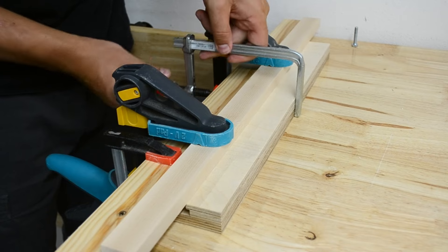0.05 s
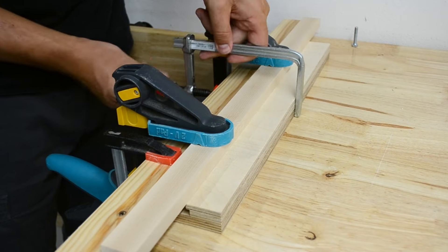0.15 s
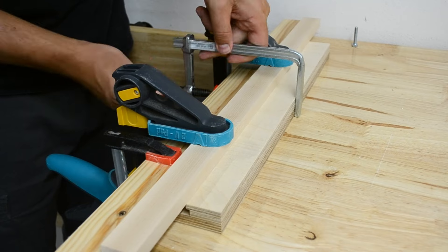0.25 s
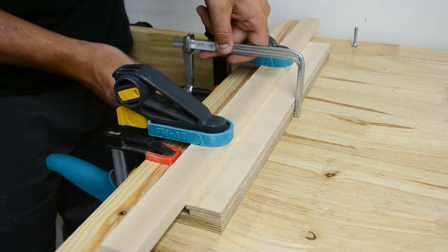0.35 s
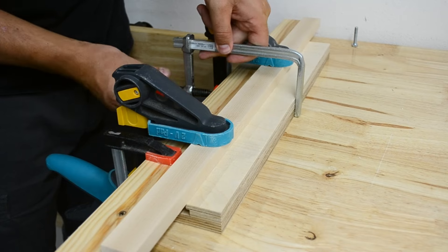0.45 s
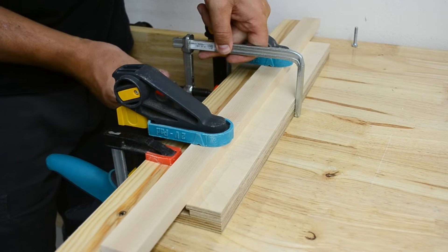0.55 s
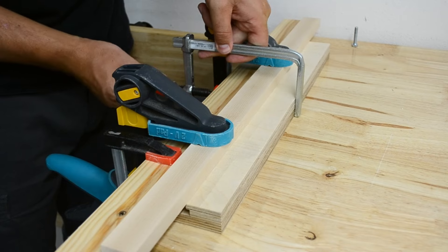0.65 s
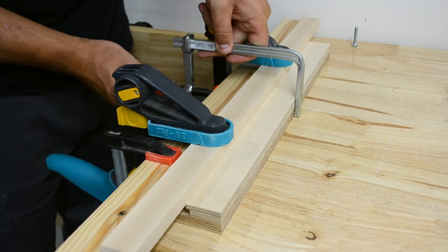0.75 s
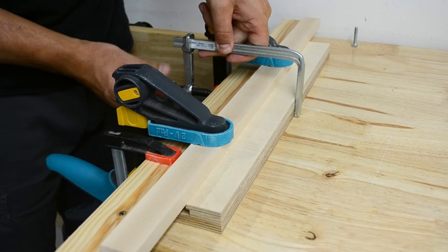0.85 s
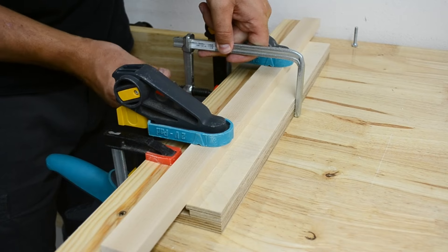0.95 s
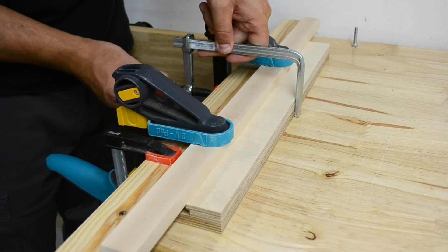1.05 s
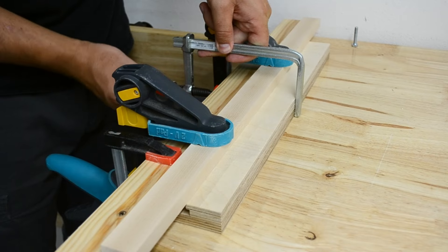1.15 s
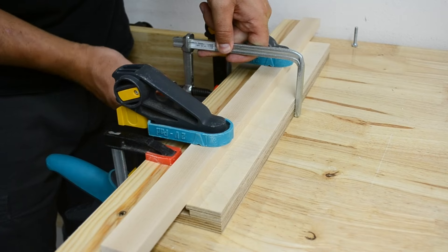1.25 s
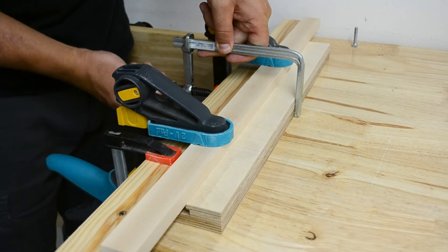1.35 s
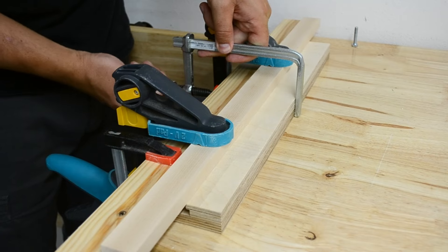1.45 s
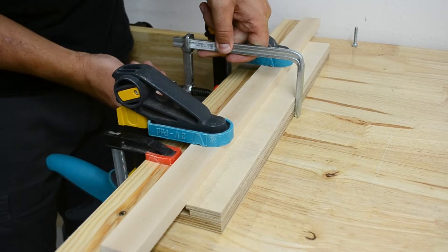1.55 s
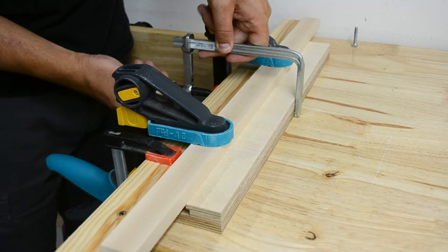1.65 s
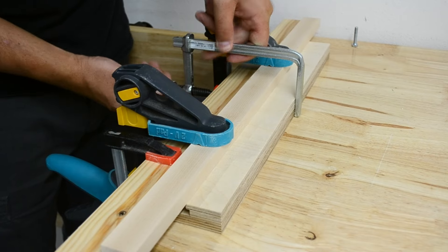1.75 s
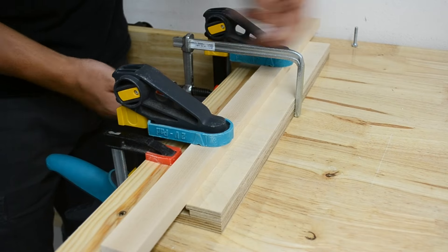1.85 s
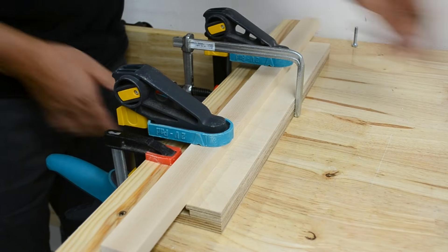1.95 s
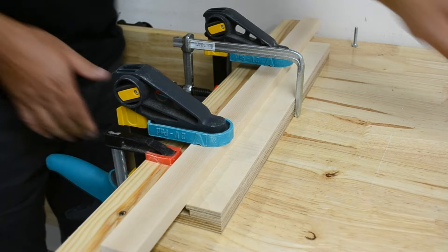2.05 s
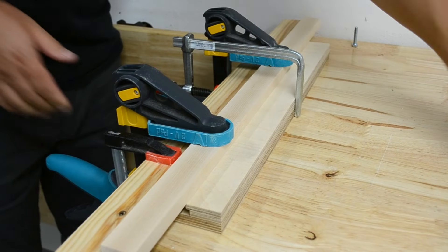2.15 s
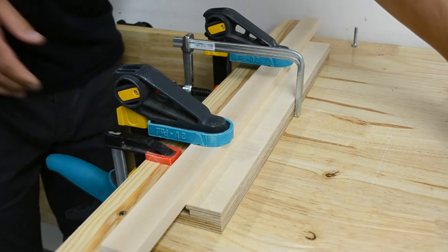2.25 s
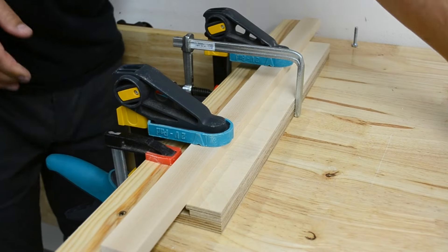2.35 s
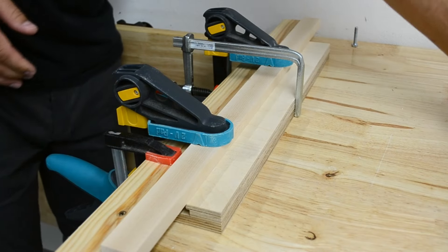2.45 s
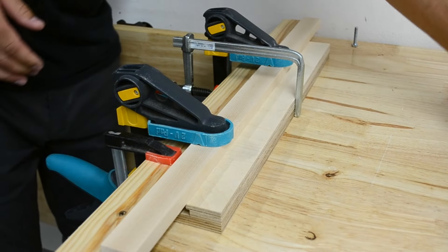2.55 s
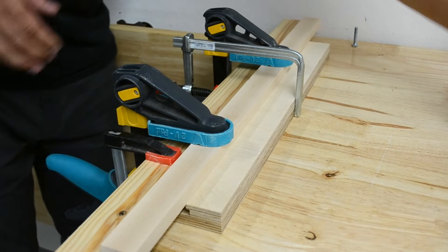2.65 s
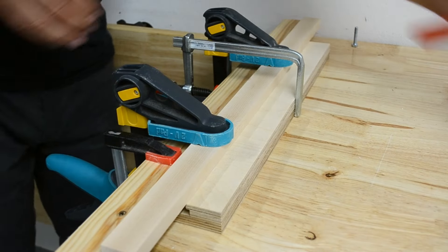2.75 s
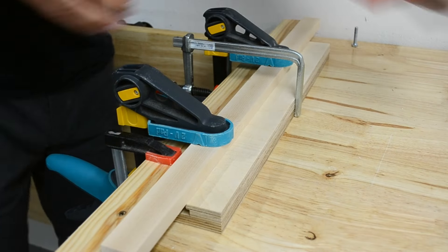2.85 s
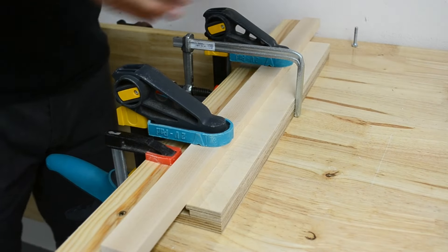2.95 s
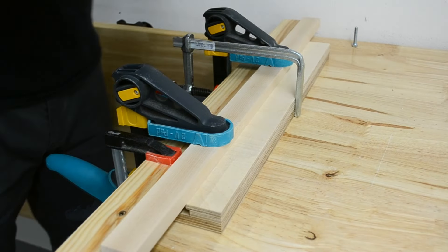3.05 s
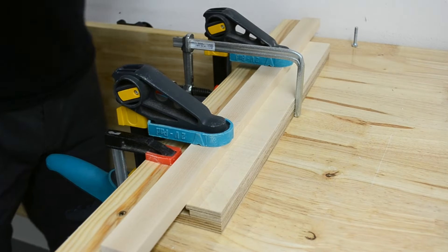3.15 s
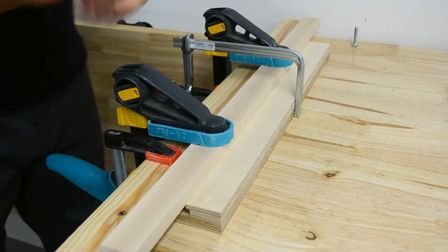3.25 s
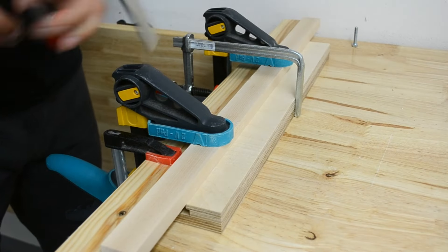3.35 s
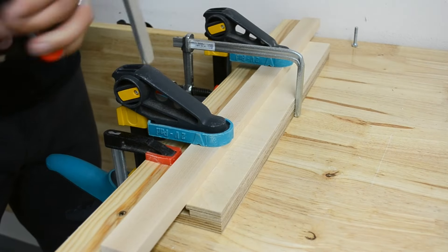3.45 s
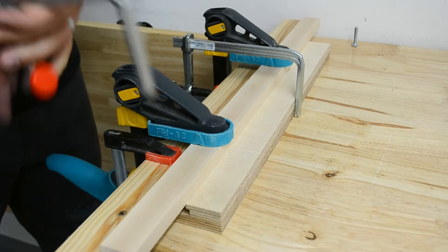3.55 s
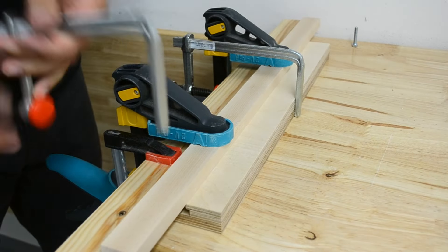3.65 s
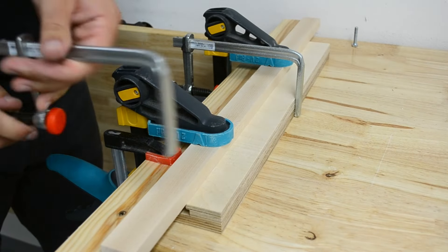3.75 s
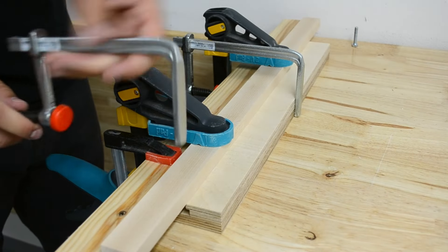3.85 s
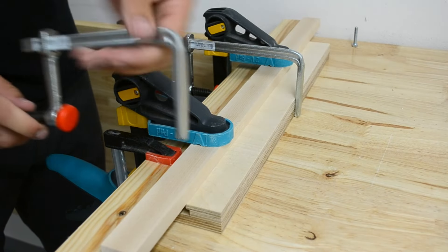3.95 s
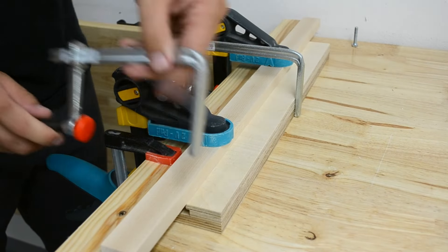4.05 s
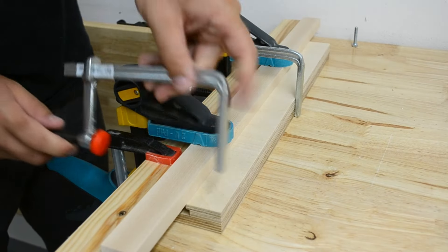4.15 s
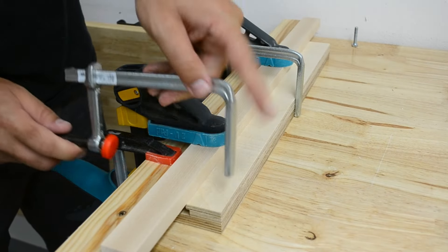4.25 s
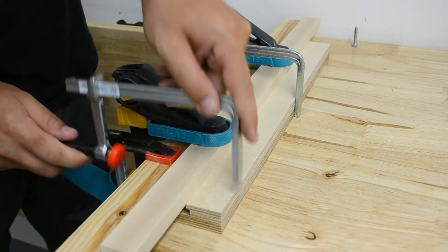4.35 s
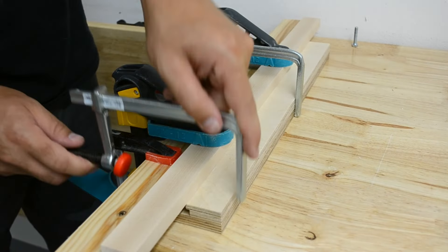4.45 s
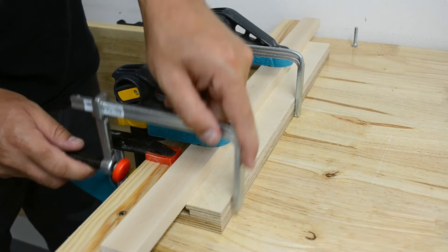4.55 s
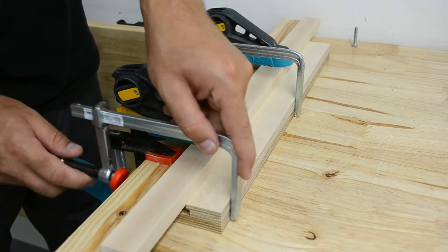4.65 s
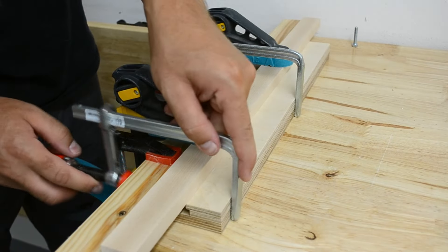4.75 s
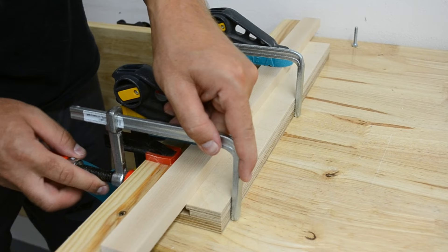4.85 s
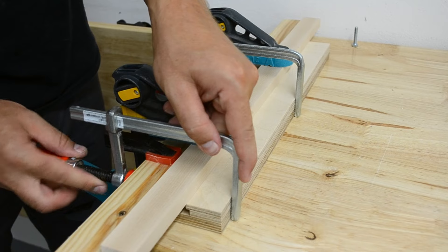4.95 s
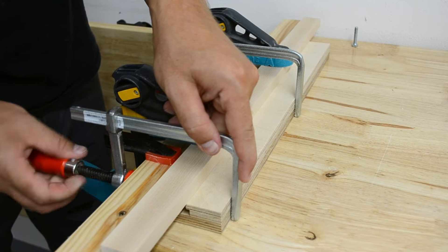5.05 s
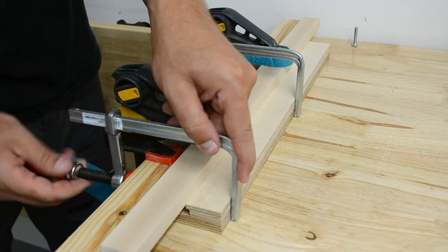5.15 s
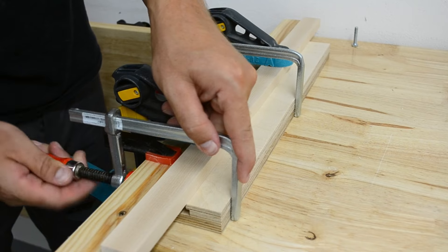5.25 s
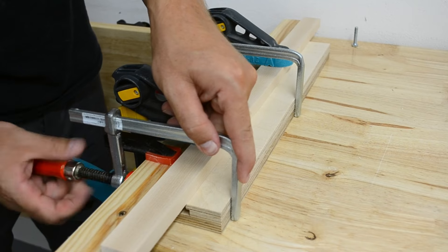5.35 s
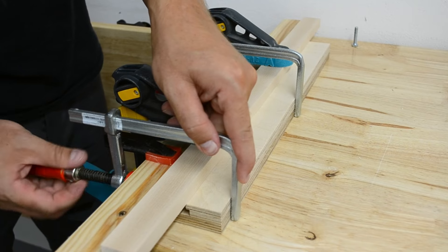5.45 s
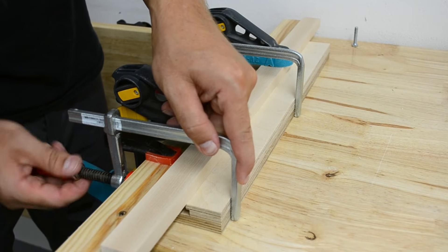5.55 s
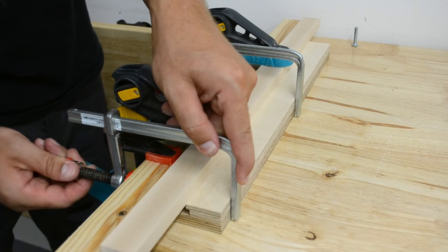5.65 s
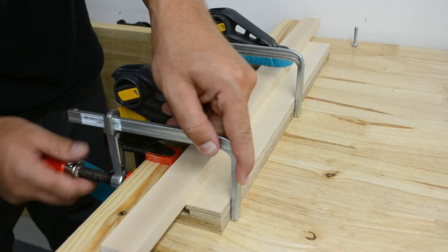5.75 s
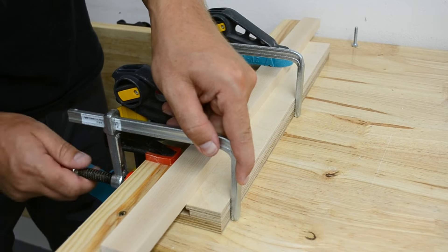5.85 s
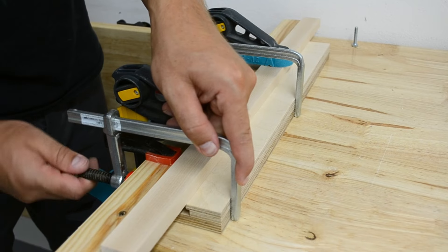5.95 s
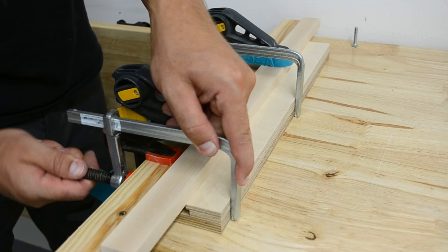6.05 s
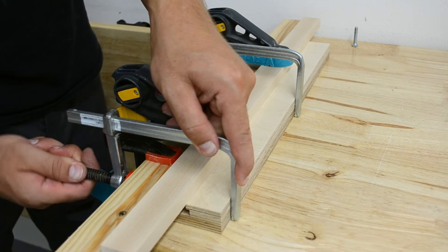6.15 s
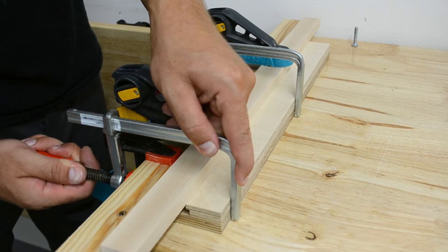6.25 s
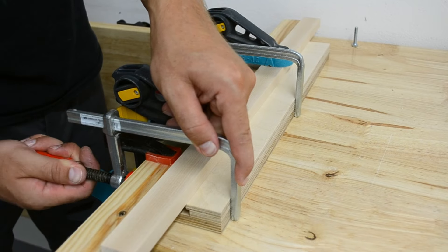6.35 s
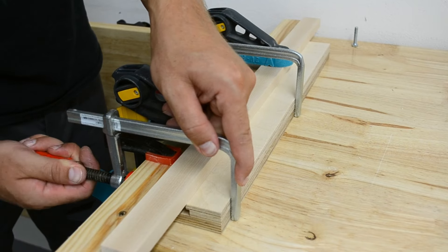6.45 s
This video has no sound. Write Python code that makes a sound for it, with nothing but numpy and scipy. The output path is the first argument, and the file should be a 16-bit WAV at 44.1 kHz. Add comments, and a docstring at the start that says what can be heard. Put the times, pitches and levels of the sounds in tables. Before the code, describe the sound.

Faint rubbing and light taps of hands on wood give way to a few dull knocks on a workbench, which hums briefly. A steel bar clamp clicks sharply, then its loose jaw slides down the bar in a bright, ringing rattle. More metal clicks and soft knocks follow as it is set on plywood and tightened. The sounds are close, in a slightly echoing workshop with a low hiss.

```python
"""Clicks, a bright rattle and dull knocks: steel bar clamps are picked up, set on plywood and tightened.
The loose jaw clicks and rattles on its bar; each contact is a noise burst plus ringing steel modes.
The workbench knocks and hums under the blows; hands and pads rub over the wood.
The hard-walled shop rings on over a low hiss."""
import sys
import numpy as np
from scipy import signal
from scipy.io import wavfile
from scipy.ndimage import uniform_filter1d

SR = 44100
rng = np.random.default_rng(int(sys.argv[2]) if len(sys.argv) > 2 else 0)


def bounce(signal):
    """Save signal as a 16-bit WAV file at the path given by the first command-line argument."""
    frames = np.transpose(np.atleast_2d(signal))
    limited = np.clip(frames, -1, 1)
    pcm = np.round(limited * 32767).astype(np.int16)
    wavfile.write(sys.argv[1], SR, pcm)


N = 286189

# modes of the clamp bar and of the bench: f/Hz, level/dB, t60/s
BAR_MODES = [(2180, -14, 0.12), (2433, -6.5, 0.19), (2850, -15.5, 0.18), (4000, -0.5, 0.13),
             (4470, -6.5, 0.12), (4670, -6, 0.15), (4950, -4.5, 0.3), (5500, -4, 0.091), (6185, -7, 0.14),
             (6700, -3, 0.22), (7330, -2.5, 0.2), (7430, -4.5, 0.3), (9100, -9.5, 0.17), (9760, -5, 0.51),
             (10230, -7.5, 0.51)]
BENCH_MODES = [(141.8, -9, 0.3), (157.3, -6, 0.3), (345, 7, 0.038), (408, 4.5, 0.33), (469, -8.5, 0.11),
               (591, -1, 0.45), (724, 6, 0.24), (696, -0.5, 0.22), (802, -2.5, 0.36), (1008, 3.5, 0.25),
               (950, -5.5, 0.18), (1254, 0, 0.13), (1315, 0.5, 0.22), (1890, 8, 0.12), (2430, -3, 0.06)]
# contact spectra of steel and of wood: f/Hz, level/dB
STEEL_DB = [(500, -45.5), (1100, -26), (1600, -9.5), (2400, -9.5), (3250, -2), (4200, -3), (4900, -3.5),
            (5750, 1), (6500, -1), (7350, -6), (8500, 1.5), (9600, 0.5), (10300, -4), (10700, -11.5),
            (11350, -24.5)]
WOOD_DB = [(60, -51.5), (108, -20.5), (135, 9), (165, 2), (200, -2), (260, 2.5), (500, -2), (1100, -3),
           (2400, -9), (3100, -18), (3700, -32.5), (6000, -44.5), (12000, -63.5)]
LEAD_IN = 6  # contact lengths over which a click or knock swells to its peak
RISE_MS = 2.6


def gain_of(db):
    """Decibels to gain."""
    return 10 ** (np.asarray(db) / 20)


def evened(x):
    """Scaled to rms 1."""
    return x / np.sqrt(np.mean(x ** 2) + 1e-20)


def peaked(x):
    """Scaled to peak 1."""
    return x / abs(x).max()


def read(points, hz):
    """Reads a table on a log-frequency axis."""
    f, value = np.transpose(points)
    return np.interp(np.log(hz + 1), np.log(f + 1), value)


def add(mix, s, sound):
    """Mixes a sound in at s seconds."""
    part = mix[round(s * SR):][:len(sound)]
    part += sound[:len(part)]


def coloured(x, db_at):
    """Causal filter with gain db_at(Hz): phase from the Hilbert transform of the log gain."""
    log_gain = np.log(gain_of(db_at(abs(np.fft.fftfreq(2048, 1 / SR)))))
    taps = np.fft.ifft(np.exp(np.conj(signal.hilbert(log_gain)))).real[:1024]
    return signal.oaconvolve(x, taps)[:len(x)]


def eq_of(points, humps=()):
    """Level/dB as a function of f/Hz: points plus Gaussian humps (f/Hz, level/dB, width/octaves)."""
    return lambda hz: read(points, hz) + sum(db * np.exp(-(np.log2((hz + 1) / f) / octaves) ** 2)
                                             for f, db, octaves in humps)


def shop_hiss(rms_db=-68.5):
    """Room air and microphone noise with faint drifting patches."""
    # noise density: f/Hz, relative level/dB
    hiss_density = [(15, -58), (25, -23), (97, -9.5), (132, -9), (200, -4.5), (309, -3.5), (399, -1.5),
                    (454, -1.5), (667, -3.5), (1030, -4), (1110, -6), (1300, -6.5), (2800, -13),
                    (10100, -29), (11500, -44.5), (15000, -71), (22000, -120)]
    frames, hz = N // 256 + 5, np.fft.rfftfreq(1024, 1 / SR)
    real, imag, wander = rng.standard_normal((frames, 513, 3)).T
    patches_db = evened(uniform_filter1d(uniform_filter1d(wander, 30, 0), 14, 1))
    bins = (real + 1j * imag) * gain_of(read(hiss_density, hz)[:, None] + patches_db)
    return gain_of(rms_db) * evened(signal.istft(bins, nperseg=1024, noverlap=768)[1][:N])


def shop_decay(x):
    """Each band of x dies at the room's own rate."""
    # reverberation of the shop: f/Hz, t60/s
    decay_times = [(500, 0.6), (1320, 0.74), (3480, 0.73), (9190, 0.46)]
    hz, t, bins = signal.stft(x, SR, nperseg=256)
    bins = bins * gain_of(-60 * t / read(decay_times, hz)[:, None])
    return signal.istft(bins, SR, nperseg=256)[1][:len(x)]


def earlier_tail(start_db=-61.5):
    """Fading room tail of a blow before the start."""
    wash = coloured(rng.standard_normal(SR), eq_of([(100, -25), (300, 0), (2950, -4), (9000, -25)]))
    return np.pad(gain_of(start_db) * shop_decay(evened(wash)), (0, N - SR))


def shop_reverb(x, build_s=0.0065):
    """Sparse wall reflections build up and decay; three tails in rotation keep like blows apart."""
    t, clock, out = np.arange(SR) / SR, np.arange(N) / SR, np.zeros(N)
    slots = np.arange(0, SR - 20, 20)
    for k in range(3):
        taps = np.zeros(SR)
        taps[slots + rng.integers(0, 20, len(slots))] = rng.choice([-1., 1.], len(slots))
        tail = shop_decay(taps) * (1 - np.exp(-(t / build_s) ** 2))
        crossfade = np.sqrt(2 / 3) * np.cos(np.pi * (7 * clock + k / 3))
        out += signal.fftconvolve(x * crossfade, tail / np.linalg.norm(tail))[:N]
    return out


def part_response(modes, samples, t60_scale):
    """Impulse response of bar or bench: one damped sine per mode."""
    t = np.arange(samples) / SR
    return sum(gain_of(db - 60 * t / (t60_scale * t60)) * np.sin(2 * np.pi * hz * t)
               for hz, db, t60 in modes)


def rubbing():
    """Hands and pads on wood: grainy friction rings the bench modes under a dry rustle."""
    # strokes: t/s, length/s, first level/dB, change to the end/dB, rustle/dB
    rub_strokes = [(0.053, 0.64, -68, -7, -10), (0.81, 0.61, -73, -29, 1.5), (1.725, 0.57, -82.5, 1.5, 8),
                   (4.548, 0.12, -78.5, 12, -18), (5.098, 0.86, -62.5, -22.5, -7)]
    rustle_eq = eq_of([(800, -27), (2000, -2.5), (7400, -17.5), (8000, -13), (9500, -10.5), (11500, -31)])
    bench = part_response(BENCH_MODES[2:], SR // 4, t60_scale=0.65)  # strokes miss the deepest modes
    out = np.zeros(N)
    for s, length_s, db, change_db, rustle_db in rub_strokes:
        t = np.arange(0, length_s, 1 / SR)
        grain = gain_of(2.2 * evened(uniform_filter1d(rng.standard_normal(len(t)), 400)))
        friction = grain * rng.standard_normal((2, len(t)))
        body = evened(signal.oaconvolve(coloured(friction[0], eq_of(WOOD_DB)), bench)[:len(t)])
        rustle = gain_of(rustle_db) * evened(coloured(friction[1], rustle_eq))
        level = gain_of(db + change_db * t / length_s) * signal.windows.tukey(len(t), .1)
        add(out, s, level * (body + rustle))
    return out


def bench_hum(hz=256.7, rise_s=0.0224):
    """A low mode of the bench top rises over some cycles and rings long."""
    # blows that excite the mode: t/s, level/dB, t60/s
    hum_onsets = [(2.357, -46, 0.57), (2.575, -40, 0.71), (5.24, -61, 0.96), (5.426, -68.5, 0.96),
                  (5.599, -79, 0.96), (5.7, -73.5, 0.96)]
    t, out = np.arange(SR) / SR, np.zeros(N)
    for s, db, t60 in hum_onsets:
        level = gain_of(db - 60 * t / t60) * (1 - np.exp(-t / rise_s))
        add(out, s, level * np.sin(2 * np.pi * hz * (t + s)))
    return out


def throbbing_modes(t, modes, eq, notes_hz, beat_hz=29.8, beat_depth=0.69, detune=0.007):
    """Each mode is a close pair and throbs; the changing grip shifts it from blow to blow."""
    hz, db, t60 = np.transpose(modes)[:, :, None]
    d_level, d_phase, d_pitch, d_beat, d_beat_phase = rng.standard_normal((5, len(modes), 1))
    hz = hz * (1 + detune * d_pitch)
    near_lift = eq_of([(1, 0)], [(f, 7, .04) for f in notes_hz])  # modes near the spot's notes ring most
    level_db = db + eq(hz) + near_lift(hz) + 2 * d_level
    beat = 1 + beat_depth * np.cos(2 * np.pi * beat_hz * gain_of(4 * d_beat) * t + np.pi * d_beat_phase)
    return (beat * gain_of(level_db - 60 * t / t60) * np.sin(2 * np.pi * hz * t + np.pi * d_phase)).sum(0)


def blow(eq, material, modes, contact_ms, notes_hz, ring_db, note_db, note_cycles, free_s=1, lift=()):
    """Contact noise swells and dies; the struck spot and the whole part ring. Rows: direct, room send."""
    choke_db_per_s, ring_send_db = 348.5, -10
    t = np.arange(SR // 2) / SR
    peak_s = LEAD_IN * contact_ms / 1000
    from_peak_ms, after_s = 1000 * (t - peak_s), np.maximum(t - peak_s, 0)
    onset = from_peak_ms / min(RISE_MS, 1.3 * contact_ms)
    rise = 1 / (1 + np.exp(-1.08 * onset))
    crack = rng.standard_normal(len(t)) * np.exp(np.where(t < peak_s, onset, -from_peak_ms / contact_ms))
    push = signal.unit_impulse(len(t), round(peak_s * SR))  # the room hears all sides: a smooth colour
    crack, push = (coloured(x, lambda hz: eq(hz) + read(material, hz)) for x in (crack, push))
    crack = peaked(coloured(crack, eq_of([(1, 0)], lift)))
    push *= np.linalg.norm(crack) / np.linalg.norm(push)
    notes = sum(gain_of(-60 * after_s * hz / note_cycles) * np.sin(2 * np.pi * hz * t) for hz in notes_hz)
    notes = gain_of(note_db) * peaked(rise * notes)
    choke = gain_of(-choke_db_per_s * np.maximum(after_s - free_s, 0))
    ring = gain_of(ring_db) * peaked(rise * choke * throbbing_modes(t, modes, eq, notes_hz))
    direct = crack + notes + ring
    send = push + .2 * notes + gain_of(ring_send_db) * ring
    return np.array([direct, send]) / abs(direct).max()


def place_blow(mix, peak_s, db, room_db, contact_ms, sound):
    """Mixes in a blow's direct sound and room send, timed by its peak."""
    for track, part, level_db in zip(mix, sound, (db, db + room_db)):
        add(track, peak_s - LEAD_IN * contact_ms / 1000, gain_of(level_db) * part)


def bench_knocks(contact_ms=4.5):
    """Blows into the wood: a thud at the struck spot, then the bench modes."""
    # t/s, peak/dB, bass/dB, tilt/(dB/octave), room send/dB, thud f/Hz
    knock_rows = [(0.198, -56.5, -8, -4.5, 9.5, 595), (0.262, -56.5, -19, -5, -3, 682),
                  (0.285, -59, -10, -12, -3, 407), (0.446, -55, -34, -5, 7, 1050),
                  (0.829, -64, -22, -9, 8, 397), (0.934, -53.5, -13, -2, 2, 1028),
                  (1.177, -56.5, -5, -9, 4, 557), (1.279, -64.5, -18, -17, -3, 431),
                  (1.736, -61.5, -30, -1, 14, 557), (2.322, -53, -13, -6, 9, 1010),
                  (2.359, -41.5, -16.5, -7, 11.5, 1006), (2.399, -37, -26.5, -5, 7, 415.7),
                  (2.482, -21.5, -23, 1, 4.5, 850), (2.508, -33.5, -17, -2.5, -1, 386),
                  (2.521, -32.5, -19, 0.5, -1, 1001), (2.562, -23, -10.5, -4.5, -1, 435.4),
                  (2.607, -32, -24, -10, -7.5, 438), (2.76, -42.5, -4, 5.5, 6.5, 1104),
                  (4.674, -54.5, 2, -5, 5.5, 424), (4.738, -41, -10.5, -1, 2, 333.6),
                  (4.757, -46, -19, -7, 0, 697), (4.793, -46, 2, 0, 7.5, 411),
                  (4.849, -46.5, 1, 9, -8, 138.7), (5.075, -48.5, -3.5, 5, 3.5, 408),
                  (5.151, -51, -0.5, -2.5, 5.5, 993), (5.178, -46, -5, -2.5, 1, 674),
                  (5.225, -46, 0, -3.5, -2.5, 343), (5.281, -50, -8.5, -9.5, -4.5, 262),
                  (5.427, -54.5, 6, -4, 6, 339), (5.487, -56.5, 8, -5.5, 0.5, 412),
                  (5.528, -63, -3, -2.5, 5, 414), (5.698, -60, 6, 0.5, -1, 263)]
    out = np.zeros((2, N))
    for s, db, bass_db, tilt, room_db, hz in knock_rows:
        eq = eq_of([(200, bass_db), (500, 0), (2400, tilt * np.log2(2400 / 500))], [(hz, 4.47, 0.5)])
        sound = blow(eq, WOOD_DB, BENCH_MODES, contact_ms, [hz], ring_db=-6, note_db=-8.5, note_cycles=34)
        place_blow(out, s + contact_ms / 1000, db, room_db, contact_ms, sound)
    return out


def jaw_rattle(ticks_per_s=1200, swell_db=21, ring_db=-5.5, room_db=-11.5):
    """The jaw rattles on the bar: dense ticks of random size, each spot with its own clink."""
    # long rattle down the bar: t/s, level/dB
    long_rattle = [(3.5, -54.5), (3.512, -39), (3.542, -54.5), (3.552, -30.5), (3.58, -38.5), (3.6, -32.5),
                   (3.634, -36.5), (3.65, -50), (3.69, -55.5), (3.72, -46.5), (3.76, -51.5), (3.8, -64)]
    # brief swells of fine ticks leading into a click: end t/s, length/s, last level/dB
    tick_swells = [(3.276, 0.046, -42.5), (4.826, 0.018, -44.5), (5.056, 0.018, -52.5)]
    swells = [[(end_s - length_s, db - swell_db), (end_s, db)] for end_s, length_s, db in tick_swells]
    eq = eq_of([(250, -7.5), (500, 21), (900, 17.5), (1500, -11.5), (2200, 3), (3100, -7.5),
                (4200, 4.5), (5000, 5.5), (9500, -9)])
    clinks = [blow(eq, STEEL_DB, BAR_MODES, contact_ms=0.62, notes_hz=[hz], ring_db=-19, note_db=-10.5,
                   note_cycles=80)[0, :SR // 10] for hz, _, _ in BAR_MODES]
    bar = coloured(part_response(BAR_MODES, SR // 5, t60_scale=0.2), eq_of([(600, -40), (1800, 0)]))
    out = np.zeros(N)
    for rows in [long_rattle] + swells:
        s, db = np.transpose(rows)
        t = np.arange(s[0], s[-1], 1 / SR)
        n = len(t)
        ticks = gain_of(2 * rng.exponential(1, n)) * (rng.random(n) < ticks_per_s / SR)
        spot = rng.integers(0, len(BAR_MODES), n)
        rattle = sum(signal.oaconvolve(ticks * (spot == k), clink)[:n] for k, clink in enumerate(clinks))
        ring = signal.oaconvolve(ticks * rng.choice([-1., 1.], n), bar)[:n]
        level = gain_of(np.interp(t, s, db)) * signal.windows.tukey(n, .15)
        add(out, s[0], level * (evened(rattle) + gain_of(ring_db) * evened(ring)))
    return np.array([out, gain_of(room_db) * out])


def jaw_clicks(choke_within_db=11, hollow_hz=3130):
    """Steel on steel: the spot clinks and the bar rings until the next firm touch chokes it."""
    # t/s, peak/dB, contact/ms, tilt/(dB/octave), room send/dB, clink f/Hz, second clink f/Hz
    click_rows = [(0.2057, -46.5, 7, -15.5, 1, 1620, 2250), (0.333, -63, 1.6, 0, -15, 9200, 7500),
                  (0.831, -58.5, 2.1, -2, -12, 2160, 9500), (1.7347, -60, 6.7, 0, 1, 1710, 5000),
                  (2.2717, -44.5, 2.22, -16, -1.5, 4030, 2500), (2.2878, -42.5, 2.03, -11, 3, 2086, 4500),
                  (2.382, -44.5, 9, -13, 4, 5250, 7200), (2.563, -47, 10.8, -7, 8, 1640, 2380),
                  (2.7505, -39.5, 7, -5, 7, 2740, 4700), (3.082, -47, 9.5, -13.5, 4, 1805, 3300),
                  (3.174, -26.5, 1.79, -3, -5.5, 5204, 2350), (3.244, -40, 1.5, -6, -4, 6460, 4300),
                  (3.275, -17.5, 2.12, -3, -3, 5150, 4620), (3.5144, -30, 1.9, -1, 1.5, 4780, 2500),
                  (3.517, -25.5, 1.67, -3, -3, 9200, 6300), (3.551, -18, 2, 2, -6.5, 9440, 6400),
                  (3.5625, -17.5, 2.13, 7, 0.5, 7300, 4800), (3.571, -23, 2.5, -4, -5.5, 6700, 4600),
                  (3.589, -18.5, 1.9, -5, -13, 7300, 9100), (3.601, -28, 1.9, -4, 0.5, 4910, 6400),
                  (3.6102, -18.5, 1.9, 1, -5.5, 7430, 4000), (3.6241, -16.5, 1.9, 0, -10.5, 6500, 4470),
                  (3.629, -25.5, 1.9, -2.5, 7, 4470, 2540), (3.635, -30, 1.4, 0, -10.5, 4450, 5600),
                  (3.659, -36, 1.5, -5.5, 12, 4500, 2850), (3.7102, -44, 1.5, -9, 3, 4670, 5100),
                  (3.719, -32, 1.9, -9.5, 3.5, 5620, 4900), (3.7453, -34, 2.3, -5.5, -21, 4950, 6400),
                  (3.876, -30.5, 1.65, -1.5, -8, 7410, 10430), (3.899, -41.5, 1.87, -4, -20.5, 4340, 5800),
                  (4.096, -54, 1.9, -2, 2, 2500, 4900), (4.54, -46.5, 1.83, -8, -5, 4400, 10200),
                  (4.61, -52, 2.3, -15, 3, 1560, 4400), (4.6912, -48.5, 1.7, -8, -3.5, 1950, 6600),
                  (4.7358, -33, 1.9, -9, 2, 4700, 10250), (4.7387, -39, 2.2, -8, -0.5, 6700, 7430),
                  (4.8021, -38.5, 2.04, -13.5, 7, 4190, 5400), (4.819, -36, 1.9, 10, -5, 5500, 8800),
                  (4.8256, -20.5, 1.85, 6.5, -6, 6700, 5000), (5.0551, -37.5, 2.6, -7, 0, 1818, 8800),
                  (5.165, -49, 1.4, -19, 0, 1800, 3150), (5.689, -61, 2.3, -5.5, -10, 1830, 5000)]
    # how freely the held steel rings, re contact noise: t/s, bar ring/dB, clink/dB, hollow/dB
    hand_grip = [(0.2, -20, -23, -16), (2.27, -26, -10, -1), (2.39, -11, -3, -5), (2.7, -12, -50, 4),
                 (3.08, -35, -7.5, -9.5), (3.18, -33, -25, -12.5), (3.3, -47, -2, -5.5),
                 (3.51, -16, -11, 0), (3.55, -6, 3.5, -11), (3.59, -5, 3, -12.5), (3.63, -2.5, -2, 0.5),
                 (3.72, -38, 9, -5), (3.88, -16, -6, -12.5), (4.1, -27, -3, -1), (4.54, -38, -17, -5),
                 (4.7, -38.5, -12, -4), (4.735, -9, -4, -3), (4.8, -27, 2, 0), (4.83, -30, -13.5, -16),
                 (5.05, -27, -14, 4)]
    grip_s, *grip_db = np.transpose(hand_grip)
    out = np.zeros((2, N))
    for s, db, contact_ms, tilt, room_db, *notes_hz in click_rows:
        firm_gaps_s = [at - s for at, next_db, *_ in click_rows
                       if at > s and next_db > db - choke_within_db]
        ring_db, clink_db, hollow_db = (np.interp(s, grip_s, column) for column in grip_db)
        humps = [(hz, 5.8, 0.088) for hz in notes_hz]
        humps.append((hollow_hz, hollow_db, 0.21))  # the steel has no modes here
        eq = eq_of([(1900, 0), (9500, tilt * np.log2(9500 / 1900))], humps)
        noise_lift = [(hz, 7 * rng.random(), .03) for hz, _, _ in BAR_MODES]
        sound = blow(eq, STEEL_DB, BAR_MODES, contact_ms, notes_hz, ring_db, clink_db, note_cycles=66,
                     free_s=min(firm_gaps_s, default=1), lift=noise_lift)
        place_blow(out, s + RISE_MS / 1000, db, room_db, contact_ms, sound)
    return out


def scene():
    """Direct sound, room and noise floor, in mono."""
    direct, send = jaw_clicks() + bench_knocks() + jaw_rattle()
    return (direct + shop_reverb(send) + bench_hum() + rubbing() + earlier_tail() + shop_hiss())[None]


def record(dry):
    """The microphone housing dips near 8 kHz; then a band limit and faint steady noise."""
    # housing response: f/Hz, level/dB
    housing_dip = [(7300, -0.5), (7950, -8.5), (8700, -4)]
    edge_hz, noise_db = 11550, -104
    heard = coloured(dry[0], eq_of(housing_dip))[None]
    taps = signal.firwin(511, edge_hz, window=("kaiser", 9), fs=SR)[None]
    return signal.oaconvolve(heard, taps, "same") + gain_of(noise_db) * rng.standard_normal(dry.shape)


dry = scene()
out = record(dry)
bounce(out)
```